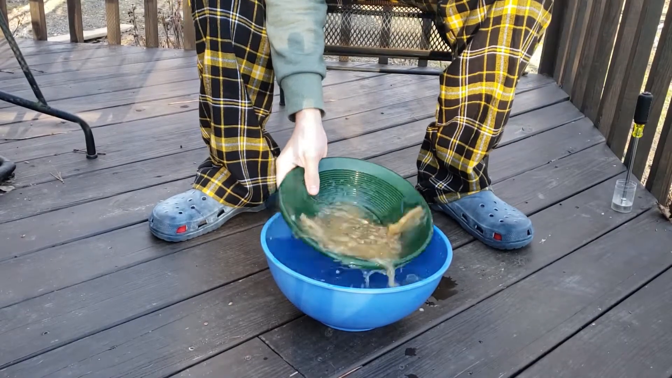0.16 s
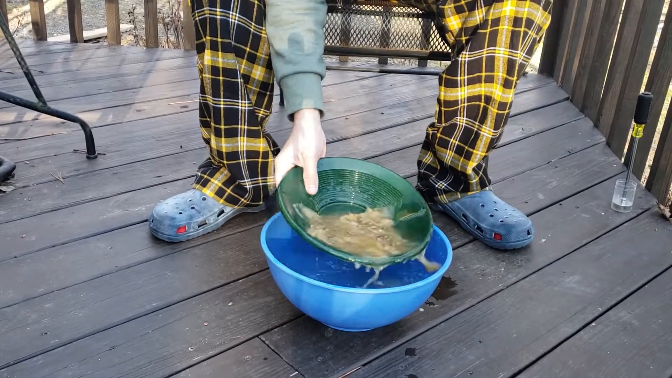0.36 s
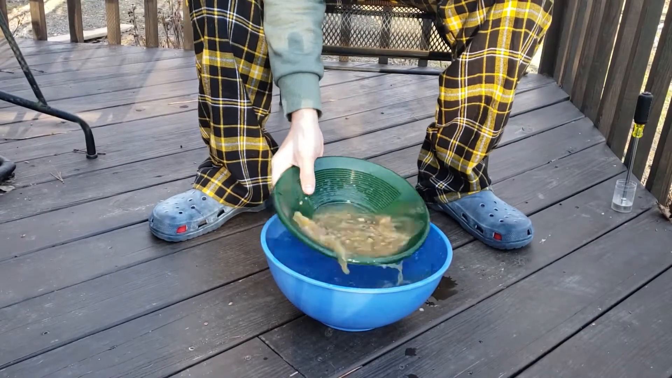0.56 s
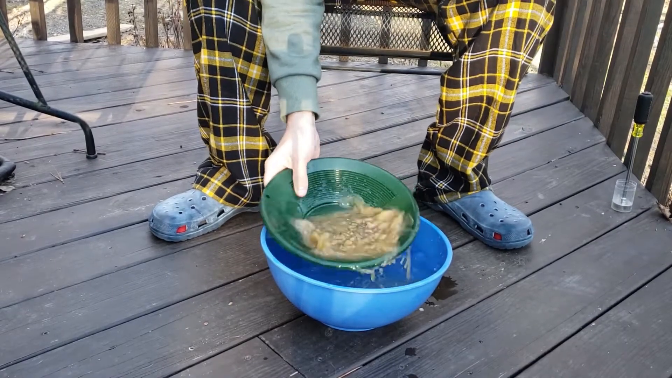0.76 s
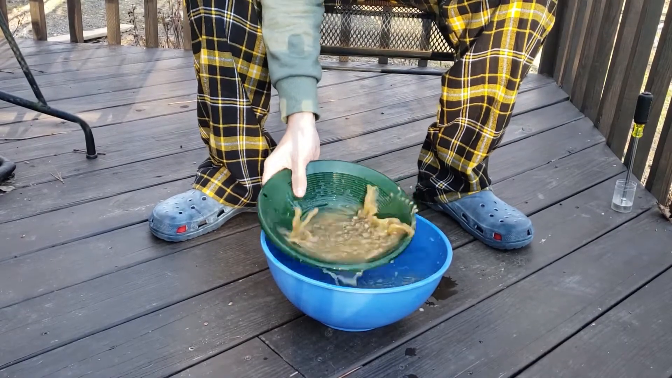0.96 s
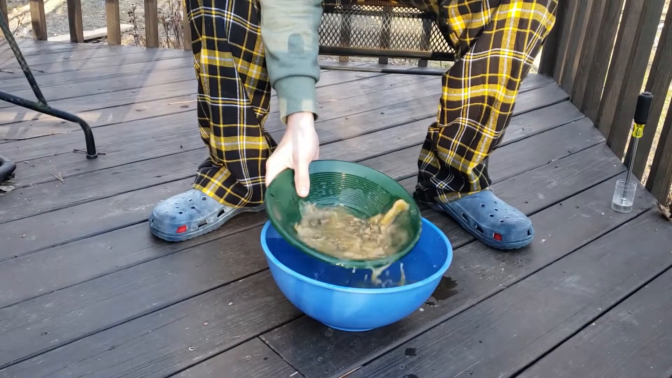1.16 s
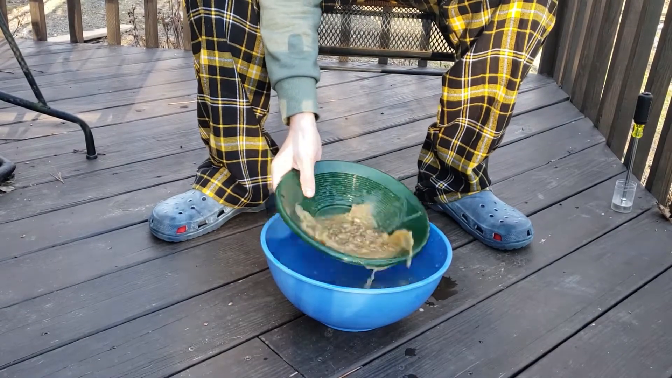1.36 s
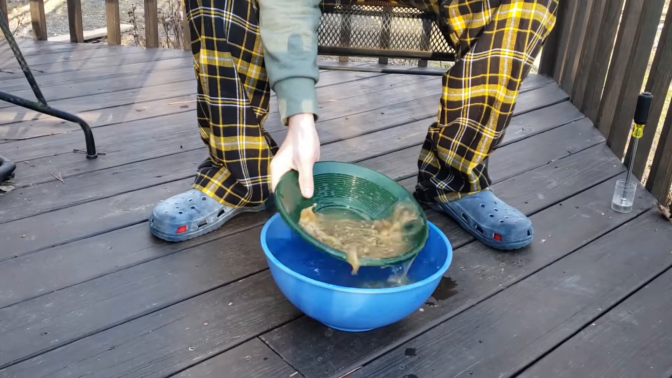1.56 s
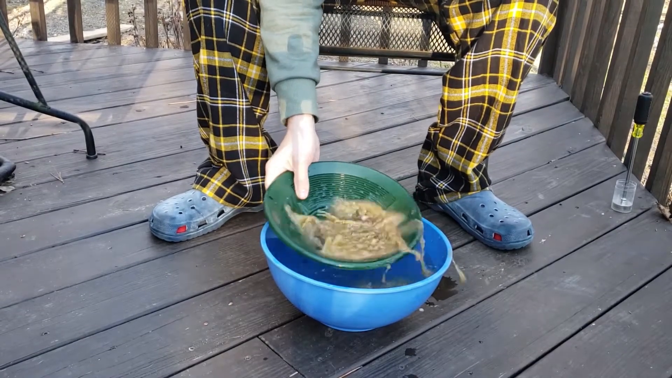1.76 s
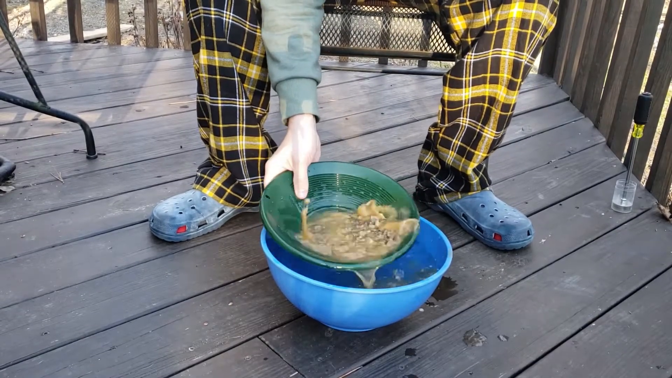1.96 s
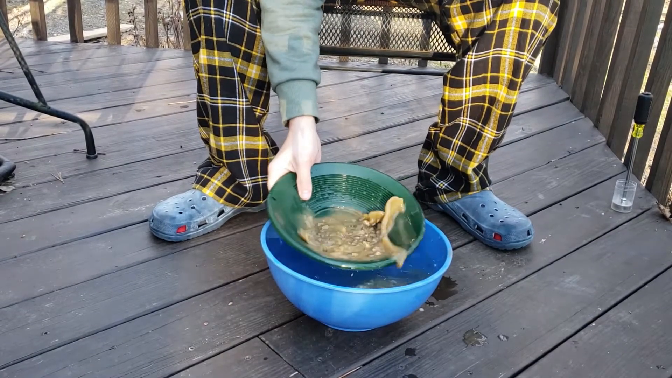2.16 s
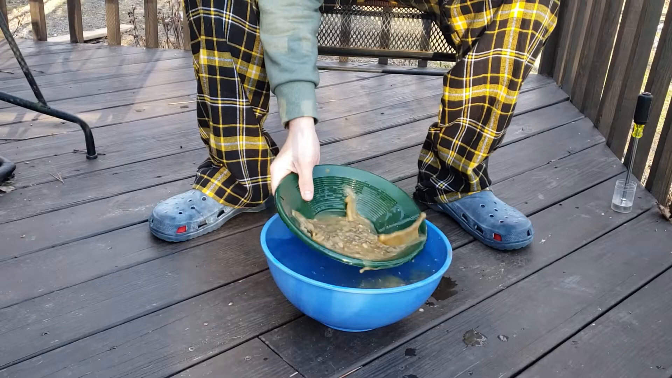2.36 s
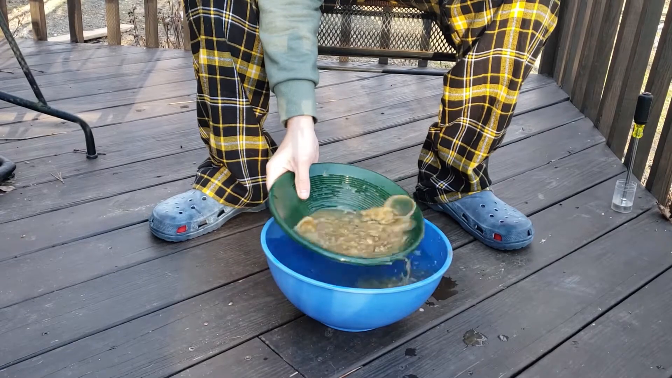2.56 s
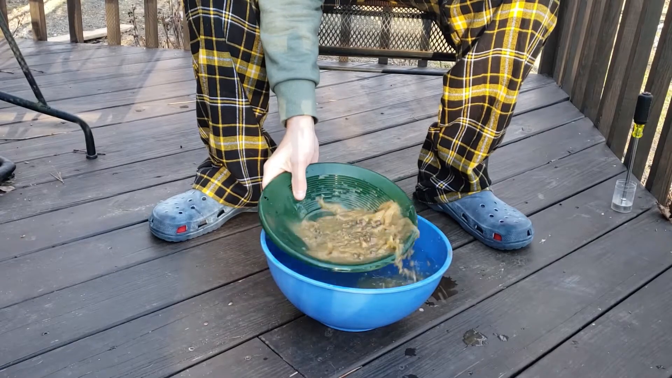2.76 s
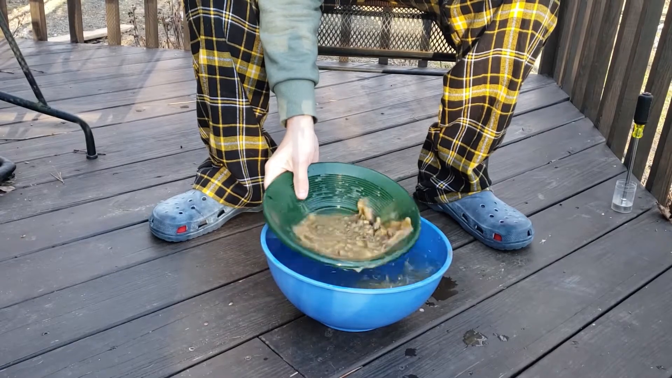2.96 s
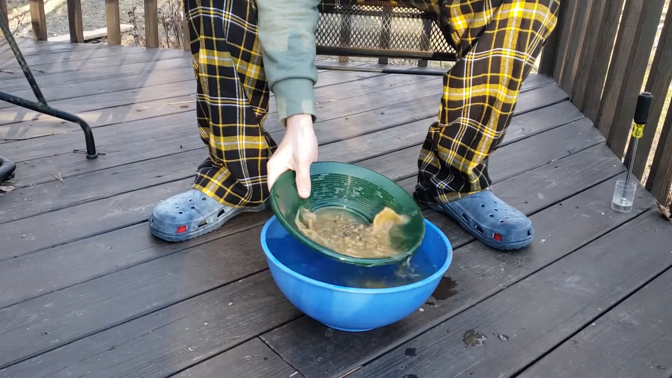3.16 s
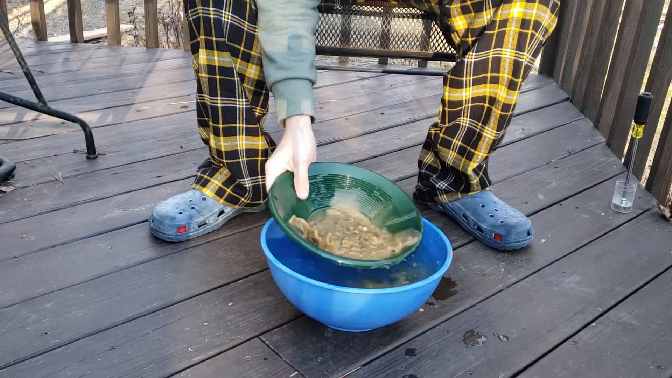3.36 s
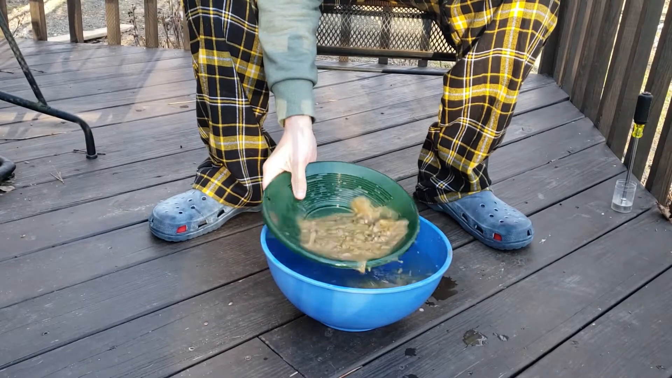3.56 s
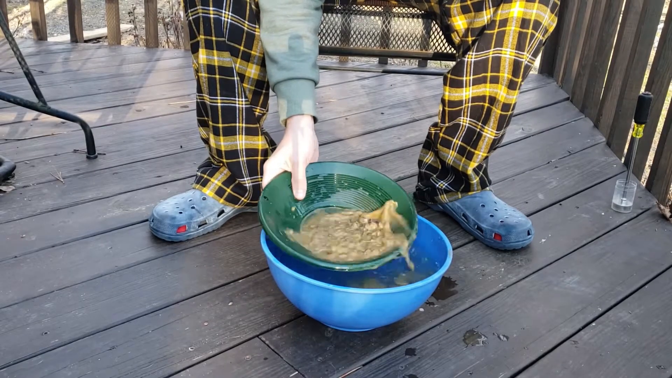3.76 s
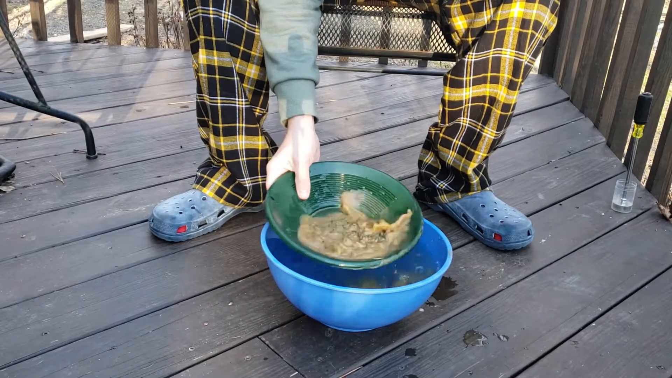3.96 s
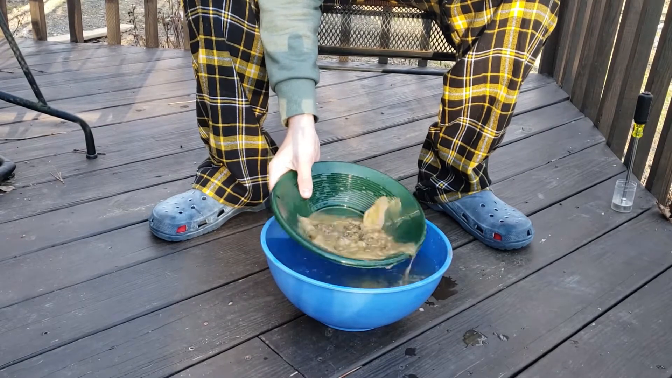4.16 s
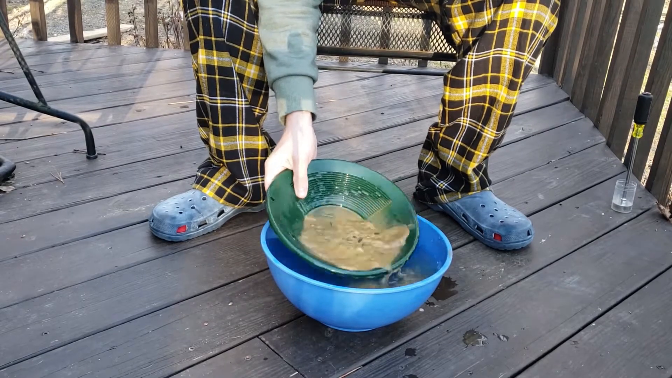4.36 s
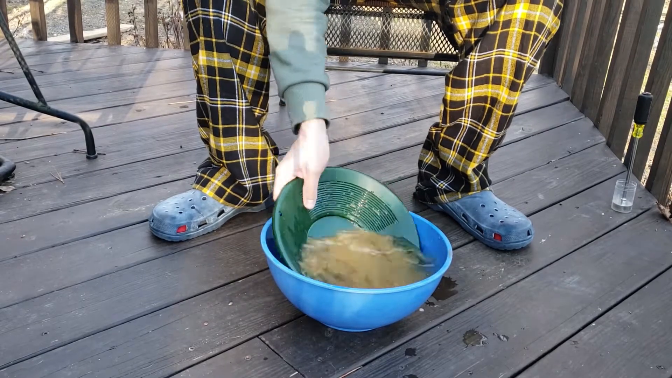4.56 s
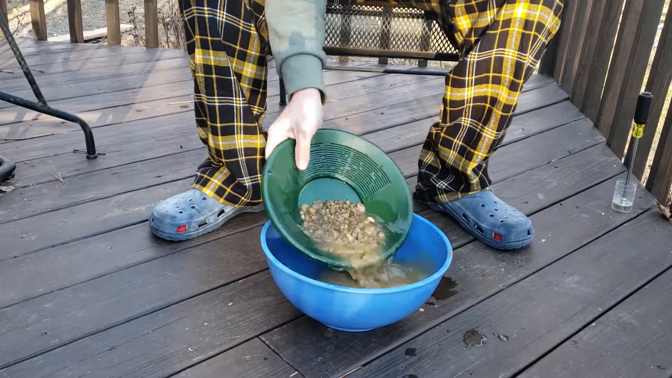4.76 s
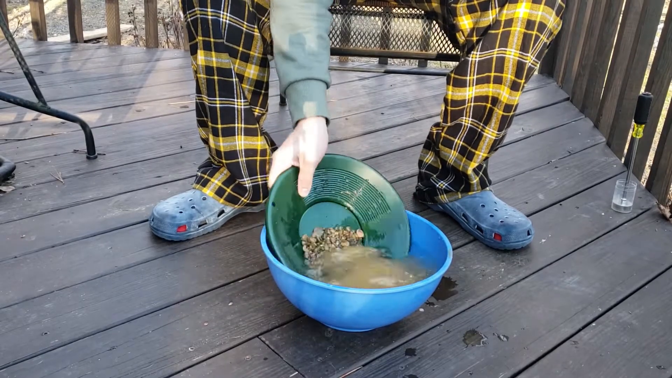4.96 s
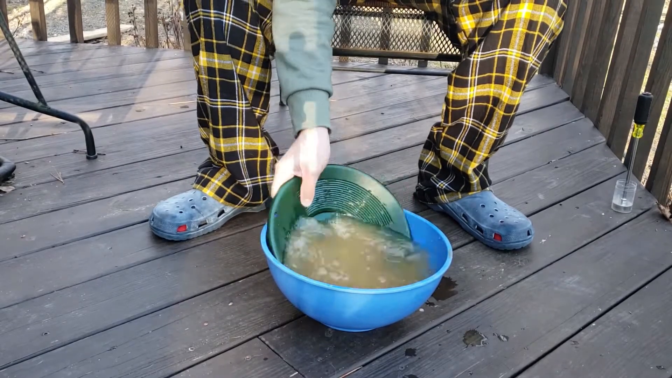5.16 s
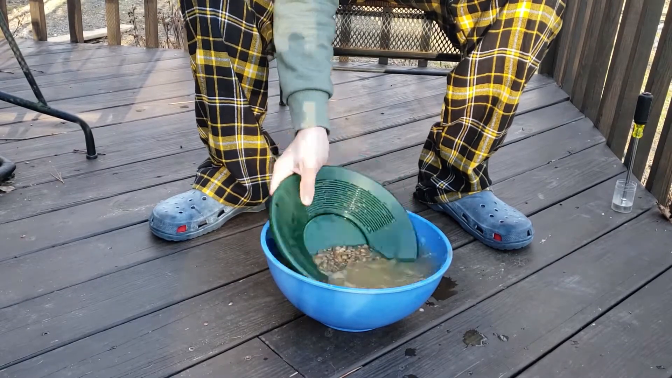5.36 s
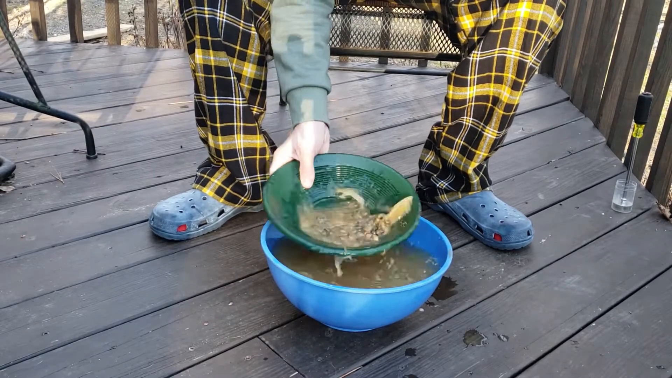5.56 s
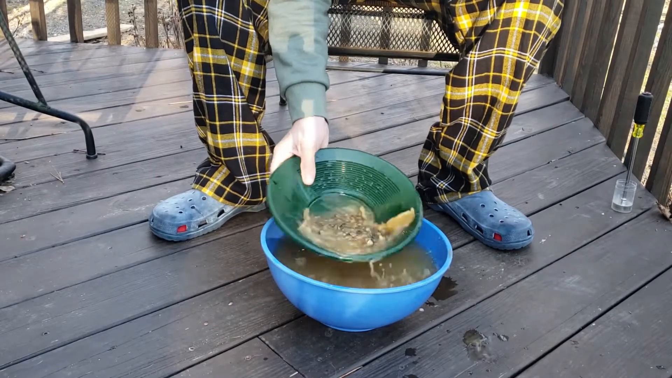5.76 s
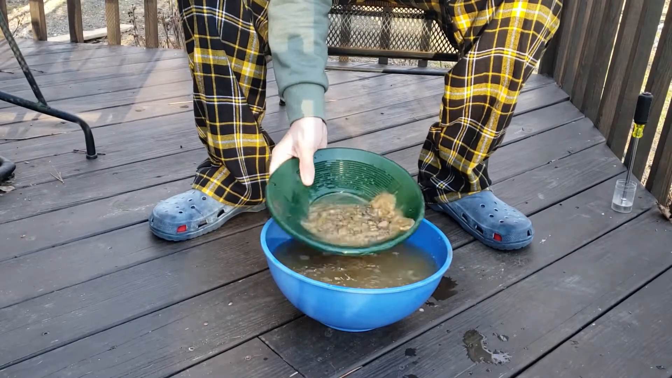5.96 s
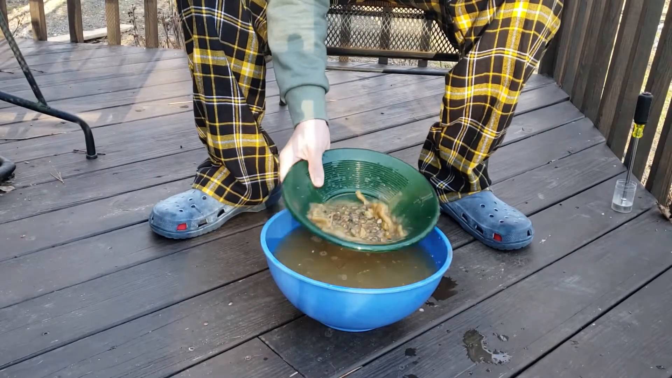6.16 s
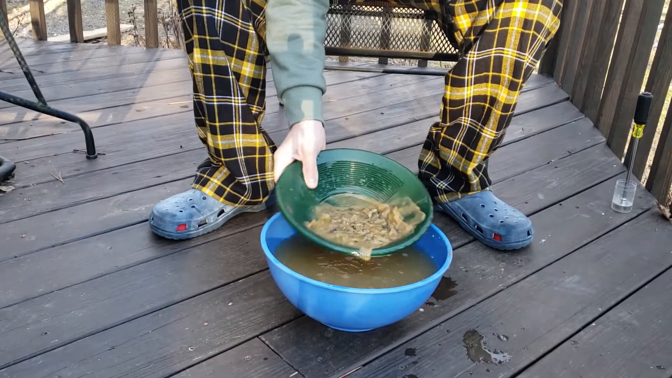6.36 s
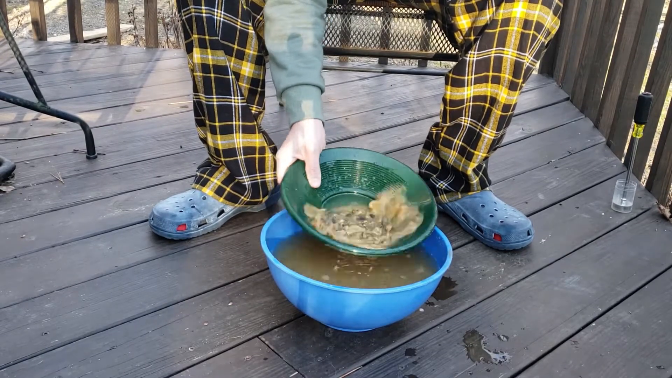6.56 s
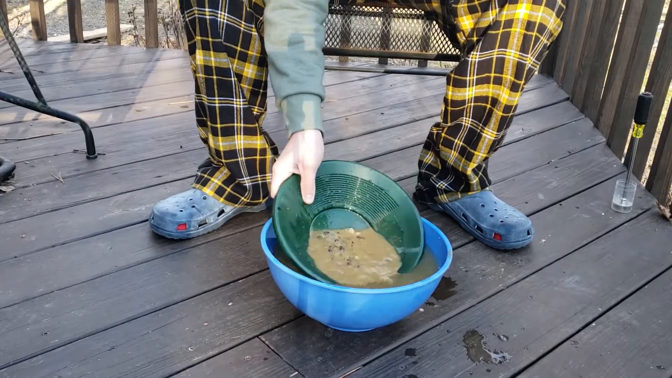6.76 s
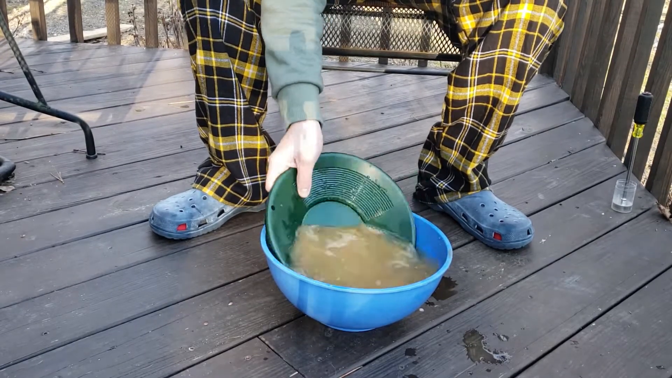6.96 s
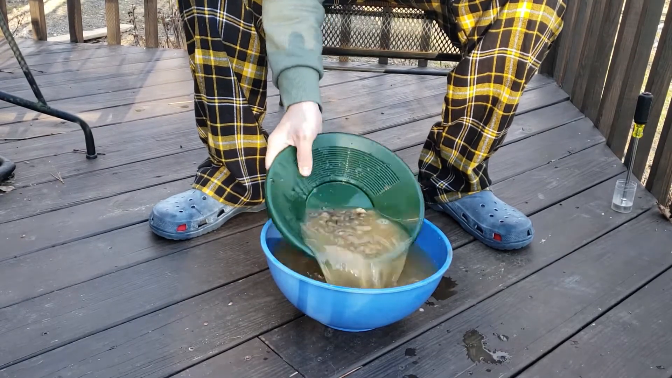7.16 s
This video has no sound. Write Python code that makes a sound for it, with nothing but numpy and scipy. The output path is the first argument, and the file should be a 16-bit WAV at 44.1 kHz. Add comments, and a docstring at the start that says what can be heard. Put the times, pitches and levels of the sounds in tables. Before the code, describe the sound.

On a breezy deck, a plastic pan of wet gravel is shaken in a fast, even rhythm, rattling and clacking while low gusts thump the microphone. A bird gives one faint, thin chirp as the shaking dies away. The rest is softer: water sloshes and bubbles in a tub, scattered drips tick, and wet sand slips across the pan with a fluttering hiss.

```python
"""On a breezy deck, wet gravel slides and rattles to and fro in a plastic pan shaken over a tub.
Stones strike the pan and its hollow body rings; wind buffets the left microphone; a bird chirps once.
The sound fades out and in again. Then bubbles gurgle in the tub, drops and grit tick,
and wet sand hisses in the pan with a fast flutter, over a quiet outdoor hush."""
import sys
import numpy as np
from scipy import signal
from scipy.fft import rfft, irfft, next_fast_len
from scipy.io import wavfile
from scipy.ndimage import uniform_filter1d

SR = 44100
rng = np.random.default_rng(int(sys.argv[2]) if len(sys.argv) > 2 else 0)


def file_out(sig):
    """Save sig as 16-bit WAV at sys.argv[1]."""
    # one column per channel
    cols = np.atleast_2d(sig).T
    # limit, then scale
    lim = np.clip(cols, -1, 1)
    pcm = np.round(lim * 32767).astype(np.int16)
    wavfile.write(sys.argv[1], SR, pcm)


N = 318402
T = np.arange(N) / SR
N_FFT = next_fast_len(N, True)
BIN_HZ = np.maximum(np.arange(N_FFT // 2 + 1) * SR / N_FFT, 1)
SHAKE_END_S, GUSTS_END_S = 4.45, 1.04

# Pan strokes. Each row: turn in seconds, slide level in dB.
STROKES = [(-0.04, -41), (0.035, -44.5), (0.125, -41), (0.189, -41.5), (0.298, -42), (0.384, -43),
           (0.465, -40.5), (0.558, -43), (0.642, -41), (0.722, -42), (0.811, -38.5), (0.894, -40),
           (0.978, -40), (1.057, -41.5), (1.146, -41.5), (1.219, -41.5), (1.317, -38.5), (1.39, -39),
           (1.492, -38), (1.558, -40), (1.653, -40.5), (1.727, -39.5), (1.812, -39.5), (1.904, -40.5),
           (1.982, -39.5), (2.08, -40.5), (2.152, -39), (2.235, -37.5), (2.31, -38), (2.385, -39),
           (2.467, -41.5), (2.536, -39.5), (2.634, -40.5), (2.71, -39.5), (2.787, -39.5), (2.869, -39.5),
           (2.956, -39.5), (3.036, -40), (3.118, -40), (3.194, -40.5), (3.282, -39), (3.365, -41),
           (3.448, -39), (3.528, -41), (3.61, -42), (3.702, -41.5), (3.782, -39.5), (3.867, -40),
           (3.943, -39.5), (4.032, -41), (4.119, -41), (4.195, -45.5), (4.285, -54), (4.364, -63)]
# Pan ringing under the load. Each row: time in seconds, level in dB.
PAN_RING_LEVEL = [(0.0, -53), (0.11, -58), (0.2, -52), (0.26, -49.5), (0.35, -63.5), (0.94, -49.5),
                  (0.98, -63), (1.01, -43.5), (1.05, -57), (1.54, -55.5), (1.57, -49.5), (1.72, -58),
                  (1.76, -49), (1.83, -62), (2.18, -53.5), (2.29, -53), (2.5, -61.5), (2.57, -49),
                  (2.67, -61), (2.72, -58), (2.8, -61), (2.84, -49.5), (2.885, -43), (2.92, -42.5),
                  (2.95, -59.5), (3.68, -52.5), (3.78, -56), (3.81, -55.5), (4.13, -59), (4.16, -52.5),
                  (4.27, -56), (4.3, -63), (4.39, -58), (4.44, -85)]
# Gravel rattle. Each row: frequency in Hz, relative density in dB.
GRAVEL_SPECTRUM = [(150, -31), (260, -21), (340, -24.5), (490, -12.5), (580, -21), (760, -4), (950, -5),
                   (1300, -8.5), (1700, -7.5), (2000, -6), (2350, -10), (2700, -9), (4990, -12.5),
                   (7060, -11), (8700, -20.5), (15200, -14.5), (16000, -21.5)]
# Rattle likeness between channels. Each row: frequency in Hz, shared power from 0 to 1.
GRAVEL_COHERENCE = [(60, 0.71), (130, 0.62), (290, 0.47), (640, 0.81), (1410, 0.47), (3100, 0.24),
                    (6820, 0.033), (15000, 0.01)]
# Rattle balance. Each row: frequency in Hz, left minus right in dB.
GRAVEL_BALANCE = [(60, 1.5), (110, 2.0), (200, 12), (380, 8.1), (700, 3.1), (1290, 2.1), (2380, 1.1),
                  (4400, 1.6), (8120, 4.8), (15000, 6.7)]
# Stones striking the pan. Each row: start in seconds, level in dB, ring in Hz.
STONE_HITS = [(0.1456, -29, 1210), (0.201, -38, 6500), (0.3091, -25, 1060), (0.3287, -26, 1890),
              (0.339, -28, 2300), (0.4858, -38, 1800), (0.664, -27, 2030), (0.676, -28, 1980),
              (0.7387, -37, 6800), (0.836, -25, 3370), (0.8785, -30, 5200), (0.8915, -26.5, 5270),
              (0.927, -31, 1470), (1.004, -24, 3320), (1.0103, -23, 2280), (1.0784, -33, 2240),
              (1.258, -28, 2330), (1.292, -29.5, 2980), (1.3276, -32, 980), (1.359, -29, 2230),
              (1.4107, -32, 2260), (1.478, -31, 3200), (1.52, -22, 2780), (1.523, -22.5, 1510),
              (1.531, -27, 3180), (1.5594, -29, 1040), (1.623, -23.5, 3890), (1.692, -29, 2000),
              (1.777, -30, 1700), (1.783, -29, 2300), (1.8413, -33, 1850), (1.861, -27, 1950),
              (2.0115, -26, 1990), (2.2735, -18, 2590), (2.277, -26, 2200), (2.3296, -26.5, 1990),
              (2.555, -26.5, 2050), (2.5601, -27, 1880), (2.576, -31, 1690), (2.696, -27.5, 1900),
              (3.0678, -37, 1000), (3.077, -31, 1610), (3.097, -33, 1500), (3.1497, -38, 1970),
              (3.166, -26, 1970), (3.302, -34, 2010), (3.406, -21, 3680), (3.4723, -25, 1730),
              (3.4758, -27, 1950), (3.557, -30, 2300), (3.817, -23, 3260), (3.824, -25.5, 2200),
              (3.908, -25.5, 2700), (4.004, -30, 2900), (4.0413, -29, 2360), (4.085, -26.5, 3080),
              (4.1644, -24.5, 2010), (4.3411, -38, 850)]
# Spells of sand hiss. Each row: start and end in seconds, start and end level in dB.
SAND_SPELLS = [(4.634, 4.722, -52, -63), (5.064, 5.141, -51, -41), (5.267, 5.388, -54.5, -51),
               (5.44, 6.759, -48.5, -44)]
# Sand hiss. Each row: frequency in Hz, relative density in dB.
SAND_SPECTRUM = [(24, -21), (40, -6.5), (250, -5.5), (500, -5), (1200, -6.5), (4500, -5.5), (8000, -5),
                 (15500, -5)]
# Bright band of the long hiss. Each row: time in seconds, centre in Hz, gain in dB.
SAND_SIZZLE = [(5.47, 5860, 0), (5.9, 5850, 3.5), (6.3, 6000, 5), (6.76, 6150, 4.5)]
# Sand slipping faster. Each row: peak time in seconds, gain in dB, fall in seconds.
SAND_SURGES = [(5.31, 8.5, 0.075), (5.695, 6, 0.025), (5.96, 2.5, 0.016), (5.97, 2.5, 0.44), (6.65, 0, .05)]
# Drops and grit. Each row: start in seconds, level in dB, ring in Hz, left minus right in dB.
TICKS = [(1.7358, -23, 13300, 4), (2.3785, -27, 14000, 6), (2.4062, -28, 13000, 6), (4.418, -45, 9000, 11),
         (4.556, -53, 11200, 24), (4.65, -33, 14900, 8), (4.666, -35, 12300, 3.0), (4.822, -43, 9880, 6),
         (4.911, -33.5, 9230, 6), (4.9372, -31.5, 15000, 8.5), (4.973, -37, 12600, 8), (5, -43, 1660, 7),
         (5.0798, -26.5, 3010, 12), (5.096, -25, 9870, 5), (5.114, -28, 9000, 11), (5.117, -21, 10300, 7),
         (5.1207, -24.5, 8350, 10), (5.1397, -29, 9000, 2), (5.146, -25.5, 11000, 9),
         (5.2081, -43, 8090, -1), (5.249, -44, 6690, 3), (5.272, -32, 3600, 10), (5.273, -25.5, 10700, 11),
         (5.2947, -26, 6570, 10), (5.373, -25, 4640, 3.5), (5.391, -28.5, 9460, 3), (6.2124, -33, 5550, 7),
         (6.2207, -34, 14500, 2), (6.3135, -45, 8660, 6), (6.4626, -38, 5670, 3), (6.649, -25, 6560, 2),
         (6.7045, -39, 2800, 4), (6.795, -43, 9000, 2), (6.843, -42.5, 8500, 4.5), (6.9364, -51, 1680, 16),
         (7.076, -31.5, 2780, 13.5), (7.0776, -36, 5900, 4), (7.0974, -45, 3010, 2),
         (7.2125, -44.5, 7190, -2)]
# Big bubbles. Each row: start in seconds, level in dB, starting pitch in Hz.
GLUGS = [(4.482, -56.5, 375), (4.491, -52, 440), (5.505, -52, 484), (5.547, -50, 377), (5.585, -49, 417),
         (5.598, -53, 366), (5.705, -40, 468), (5.751, -46, 430), (5.759, -45, 474), (5.785, -43.5, 478),
         (5.796, -50, 608), (5.99, -46, 624), (6.833, -60, 500), (6.845, -51, 600)]
# Water in the tub. Each row: time in seconds, level in dB.
GURGLE_LEVEL = [(4.46, -64.5), (5.0, -62), (5.45, -61), (5.78, -60), (5.86, -65), (6.1, -64), (6.4, -70),
                (7.22, -66.5)]
# Waves slapping the tub. Each row: peak time in seconds, level in dB, fall in seconds.
SLOSHES = [(4.49, -70, 0.014), (4.809, -51, 0.011), (5.08, -68, .015), (5.28, -59, 0.017),
           (5.555, -59, 0.03), (5.7, -57, 0.014), (5.755, -54, 0.034), (6.835, -58, 0.023)]
# Wind buffeting. Each row: time in seconds, level in dB.
WIND_LEVEL = [(0.0, -41), (0.21, -34), (0.26, -45), (0.32, -38), (0.38, -58), (0.54, -36), (0.65, -42.5),
              (0.75, -32), (1.02, -54), (1.29, -51), (1.32, -56.5), (1.45, -58), (1.52, -51.5), (1.67, -65),
              (1.7, -58.5), (1.85, -49), (1.91, -61), (2.07, -52), (2.1, -54), (2.19, -57), (2.22, -58),
              (2.35, -51.5), (2.49, -61), (2.58, -55), (2.76, -60), (2.79, -52), (3.08, -57), (3.13, -60),
              (3.25, -54), (3.37, -59.5), (3.54, -54), (3.58, -60.5), (3.85, -50.5), (3.9, -55),
              (3.94, -44.5), (4.09, -55), (4.12, -51), (4.2, -52.5), (4.24, -45), (4.3, -58), (4.33, -54),
              (4.45, -57)]
# Wind rumble. Each row: frequency in Hz, relative density in dB.
WIND_SPECTRUM = [(15, -48), (27, -16), (40, -11.5), (55, 1.5), (72, -2.5), (100, -9.5), (140, -14.5),
                 (250, -31.5), (460, -38), (770, -120)]
# Gust thumps. Each row: start in seconds, level in dB, final pitch in Hz, T60 in seconds.
THUMPS = [(0.057, -29, 97, 0.14), (0.102, -10.5, 73.4, 0.038), (0.159, -22.5, 94, 0.079),
          (0.21, -22.5, 72, 0.099), (0.308, -19.5, 75.5, 0.081), (0.52, -3.5, 70, 0.011),
          (0.726, -49, 73.4, 0.06), (0.82, -35, 61.9, 0.076)]
# Bird note. Each row: time in seconds, pitch in Hz, level in dB.
CHIRP = [(4.379, 7450, -78), (4.386, 7500, -53), (4.396, 7150, -58), (4.42, 7170, -57), (4.443, 7100, -73)]
# Outdoor hush. Each row: time in seconds, level in dB.
AIR_LEVEL = [(4.46, -66), (5.0, -60.5), (5.3, -62), (6.78, -62.5), (7.22, -62.5)]
# Hush colour. Each row: frequency in Hz, relative density in dB.
AIR_SPECTRUM = [(100, -20), (300, 5.5), (600, 5.5), (1500, 2.5), (3000, -4.5), (8000, -3.5), (16000, -7.5)]
# Overall fade. Each row: time in seconds, gain in dB.
FADE = [(4.42, 2.5), (4.435, -11.5), (4.447, -22), (4.46, -23), (4.472, -5), (4.49, -2.5)]


def gravel(ring_hz=754.6, ring_width_hz=118, rest_db=-56.5):
    """Each stroke the load stalls at the turn, then slides and rattles over the pan's ridges."""
    turn_s, slide_db = np.transpose(STROKES)
    edges_s = np.append(turn_s, SHAKE_END_S)
    stroke = np.clip(np.searchsorted(edges_s, T) - 1, 0, len(turn_s) - 1)
    progress = np.clip((T - edges_s[stroke]) / np.diff(edges_s)[stroke], 0, 1)
    direction = np.arange(len(turn_s)) % 2
    stall_db = np.array([-10.5, -6])[direction]  # deeper at one end of the swing
    around_db = (slide_db + np.append(slide_db[0], slide_db[:-1])) / 2
    floor_db = np.interp(T, turn_s, np.maximum(around_db + stall_db, rest_db))
    fastest_at = np.array([.52, .48])[direction[stroke]]
    speed = np.sin(np.pi * progress ** (np.log(.5) / np.log(fastest_at))) ** 0.9
    level = undb(floor_db + (slide_db[stroke] - floor_db) * speed) * (T < SHAKE_END_S)
    rattle = stereo(grains(3000, 2.28, 0.00087), per_bin(GRAVEL_COHERENCE), per_bin(GRAVEL_BALANCE))
    # the hollow pan rings on through the turns, a little weaker
    drive = rattle * undb(2.5 * speed + 2 * wander(23.86))
    ring = resonate(resonate(drive, ring_hz, ring_width_hz), ring_hz, 2 * ring_width_hz)
    slide = load_shift(colour(rattle, GRAVEL_SPECTRUM)) + undb(-9) * cut_bass(clacks())
    return level * slide + unit(ring) * envelope(PAN_RING_LEVEL)


def load_shift(x, depth_db=0.97, rate_hz=25):
    """Each octave swells and fades on its own as the load shifts, the lowest most."""
    spectrum, out = rfft(x, N_FFT), 0
    octave = np.log2(np.maximum(BIN_HZ, 250) / 250)
    for k in range(8):
        share = np.clip(1 - np.abs(octave - k), 0, 1)
        drift_db = depth_db * wander(rate_hz) + (k == 0) * 3.5 * wander(10)
        out = out + irfft(spectrum * share, N_FFT)[..., :N] * undb(drift_db)
    return unit(out)


def clacks(count=2000):
    """Pebbles collide at random and ring briefly."""
    out, t = np.zeros((2, N)), T[:500]
    for when, pitch_a, pitch_b, size, side, sustain in rng.random((count, 6)):
        hz = 1300 * 4.5 ** ((pitch_a + pitch_b) / 2)
        ring = np.sin(2 * np.pi * hz * t) * np.exp(-hz * t / (1 + 11 * sustain ** 4))
        size_db = -1.8 * np.log(1 - .95 * size)
        add(out, SHAKE_END_S * when, ring * undb(size_db) * balance(1 + 18.4 * (side - .5)))
    return out / rms(out[:, T < SHAKE_END_S])


def stones(crack_t60_s=0.0058, ring_t60_s=0.025):
    """A stone hits the pan: hard contact, a crack with a rebound, a slightly rising ring."""
    out, t = np.zeros((2, N)), T[:2000]
    for start_s, db, hz in STONE_HITS:
        burst = decay(t, crack_t60_s) * attack(t, 0.00045)
        noise = rng.standard_normal((3, len(t)))
        rebound = 0.29 * np.roll(burst, int(SR * rng.uniform(0.0041, 0.0044)))
        crack = noise * (burst + rebound)
        centre = resonate(crack[0] + 1.46 * contact(t, .0005), hz, 0.94 * hz)
        sides = crack[1:] * min(hz / 2400, 1.6)
        ring = np.sin(2 * np.pi * hz * t * (1 + 5.9 * t)) * decay(t, ring_t60_s) * attack(t, 0.00018)
        knock = 0.28 * ring + 1.13 * centre + 0.45 * sides
        add(out, start_s, at_peak(knock, db) * balance(3))
    return cut_bass(out)


def sand(flutter_hz=94.9, flutter_depth_db=1.5, attack_s=0.027, release_s=0.03):
    """Fine grains slip in spells: a fluttering hiss with a bright band."""
    hiss = unit(colour(stereo(grains(4000, 2.36, 0.00046), 0.17, 5.7), SAND_SPECTRUM))
    time_s, centre_hz, sizzle_db = np.transpose(SAND_SIZZLE)
    # low noise band shifted up to the moving centre
    narrow = butter(stereo(grains(2700, 1.8, 0.0022), 0.53, 3), 2, 480)
    sizzle = unit(narrow * sine(np.interp(T, time_s, centre_hz)))
    sizzle *= envelope(np.transpose([time_s, sizzle_db]))
    flutter_db = flutter_depth_db * (1 + 0.5 * wander(60)) * np.sin(2 * np.pi * flutter_hz * T + 0.37)
    spells = 0
    for start_s, end_s, start_db, end_db in SAND_SPELLS:
        onset = np.clip((T - start_s) / attack_s, 0, 1)
        release = np.clip(1 + (end_s - T) / release_s, 0, 1) ** 2
        spells += undb(np.interp(T, [start_s, end_s], [start_db, end_db])) * onset * release
    surge_db = sum(db * swell(peak_s, 0.045, fall_s) for peak_s, db, fall_s in SAND_SURGES)
    return (hiss + undb(-15.5) * sizzle) * spells * undb(surge_db + flutter_db + 0.26 * wander(8.4))


def ticks():
    """Drops and grit land: a bright crack, a brief ring, a short spray tail."""
    out, t = np.zeros((2, N)), T[:2000]
    for start_s, db, hz, balance_db in TICKS:
        burst = (decay(t, 0.0081) + 0.097 * decay(t, 0.055)) * attack(t, 0.00035)
        noise = rng.standard_normal((3, len(t))) * burst
        crack = 0.5 * noise[0] + 1.13 * noise[1:] + 0.99 * np.gradient(contact(t, .0006))
        ring = np.sin(2 * np.pi * hz * t) * decay(t, .014)
        tick = crack + 0.34 * ring - 0.18 * resonate(crack, 125, 280)
        add(out, start_s, at_peak(tick, db) * balance(balance_db))
    return out


def glugs(decay_cycles=0.99):
    """Big bubbles plop, rising in pitch as they die."""
    out, t = np.zeros((2, N)), T[:1500]
    for start_s, db, hz in GLUGS:
        tone = np.sin(2 * np.pi * hz * t * (1 + 5.5 * t))
        plop = tone * np.exp(-hz * t / decay_cycles) * attack(t, 0.00093)
        add(out, start_s, at_peak(plop, db) * balance(-1.4))
    return out


def gurgle(count=2000, start_s=4.4, span_s=2.8):
    """Water sloshes in the tub: many short rising bubbles, louder at each wave."""
    out, t = np.zeros((2, N)), T[:1200]
    for when, pitch_a, pitch_b, size, side, phase in rng.random((count, 6)):
        hz = 340 * 2.8 ** ((pitch_a + pitch_b) / 2)
        cycles = hz * t
        bubble = np.sin(2 * np.pi * (phase + cycles * (1 + 1.85 * t))) * cycles * np.exp(-cycles / 1.08)
        size_db = -1.6 * np.log(1 - .99 * size)
        add(out, start_s + span_s * when, bubble * undb(size_db) * balance(25.2 * (side - .5)))
    waves = sum(undb(db) * swell(peak_s, 0.0068, fall_s) for peak_s, db, fall_s in SLOSHES)
    level = envelope(GURGLE_LEVEL) * undb(1.1 * wander(19)) + waves
    return out / rms(out[:, int(start_s * SR):]) * level


def wind():
    """Low buffeting, with thumps on the left; the early gusts hit each microphone on its own."""
    turbulence = lambda: undb(1.25 * wander(25)) * rng.standard_normal(N)
    calm = unit(colour(stereo(turbulence, 0.74, 3.1), WIND_SPECTRUM))
    gusty = unit(colour(stereo(turbulence, 0.053, 6.7), WIND_SPECTRUM))
    out = np.where(T < GUSTS_END_S, gusty, calm) * envelope(WIND_LEVEL)
    t = T[:6000]
    for start_s, db, hz, t60_s in THUMPS:
        # pitch falls as the pressure settles
        push = np.sin(2 * np.pi * hz * (t + 0.0068 * attack(t, 0.005)))
        add(out[0], start_s, undb(db) * push * attack(t, 0.003) * decay(t, t60_s))
    return out


def bird():
    """One thin wavering note."""
    time_s, hz, db = np.transpose(CHIRP)
    note = sine(np.interp(T, time_s, hz) + 60 * wander(400)) * envelope(np.transpose([time_s, db]))
    return np.sqrt(2) * note * undb(2.7 * wander(300)) * balance(5)


def air():
    """Outdoor hush with tiny bursting bubbles, after the shaking; the treble thins at the end."""
    hush = unit(colour(stereo(lambda: rng.standard_normal(N), 0.28, 4.4), AIR_SPECTRUM))
    bursts = stereo(grains(40, 1.4, 0.0019), 0.46, 4)
    hush += undb(-7) * butter(bursts, 2, 4000, "high")
    dullness = np.interp(T, [6.8, 7.15], [.1, .6])
    hush += (butter(hush, 1, 5000) - hush) * dullness
    level_db = np.interp(T, *np.transpose(AIR_LEVEL)) + 1.2 * wander(11)
    return hush * undb(level_db) * (T > SHAKE_END_S)


def grains(rate_hz, spread_db, tail_s):
    """Source of noises with one shared loudness that jumps at each collision and dies away."""
    hit, size = rng.random((2, N))
    pulses = (hit < rate_hz / SR) * undb(-2 * spread_db * np.log(1 - .999 * size))
    power = signal.lfilter([1], [1, -np.exp(-1 / (tail_s * SR))], pulses)
    loudness = unit(np.sqrt(power))
    return lambda: loudness * rng.standard_normal(N)


def stereo(draw, coherence, balance_db):
    """Left and right from one shared and two separate draws."""
    shared = np.sqrt(coherence) * rfft(draw(), N_FFT)
    separate = np.sqrt(1 - coherence) * rfft([draw(), draw()], N_FFT)
    return irfft(balance(balance_db) * (shared + separate), N_FFT)[:, :N]


def colour(x, spectrum):
    """Minimum-phase filter; keeps clicks sharp."""
    cepstrum = irfft(np.log(undb(per_bin(spectrum))), N_FFT)
    cepstrum[1:N_FFT // 2] *= 2
    cepstrum[N_FFT // 2 + 1:] = 0
    return irfft(rfft(x, N_FFT) * np.exp(rfft(cepstrum)), N_FFT)[..., :N]


def per_bin(rows):
    hz, value = np.transpose(rows)
    return np.interp(np.log(BIN_HZ), np.log(hz), value)


def resonate(x, hz, width_hz):
    return signal.lfilter(*signal.iirpeak(hz, max(hz / width_hz, .3), SR), x)


def butter(x, order, hz, kind="low"):
    return signal.sosfilt(signal.butter(order, hz, kind, fs=SR, output="sos"), x)


def cut_bass(x):
    """Steep high-pass: the clacks and stones carry little below about 660 Hz."""
    return butter(x, 4, 660, "high")


def wander(rate_hz):
    """Slewed random steps, RMS 1."""
    hold = int(SR / rate_hz)
    steps = np.repeat(rng.standard_normal(N // hold + 1), hold)[:N]
    return unit(uniform_filter1d(steps, hold))


def envelope(rows):
    """Gain from rows of seconds and dB; silent outside them."""
    return undb(np.interp(T, *np.transpose(rows), left=-200, right=-200))


def swell(peak_s, rise_s, fall_s):
    return np.exp(-np.abs(T - peak_s) / np.where(T < peak_s, rise_s, fall_s))


def contact(t, at_s):
    """Pulse of a hard first contact."""
    return np.exp(-.5 * ((t - at_s) / .00004) ** 2)


def attack(t, rise_s):
    return 1 - np.exp(-t / rise_s)


def decay(t, t60_s):
    return undb(-60 * t / t60_s)


def sine(hz):
    return np.sin(2 * np.pi * np.cumsum(hz) / SR)


def balance(left_minus_right_db):
    return undb(np.array([[.5], [-.5]]) * left_minus_right_db)


def undb(db):
    return 10 ** (np.asarray(db) / 20)


def rms(x):
    return np.sqrt(np.mean(x ** 2))


def unit(x):
    return x / rms(x)


def at_peak(x, db):
    return undb(db) * x / np.abs(x).max()


def add(out, start_s, sound):
    i = int(start_s * SR)
    out[..., i:i + sound.shape[-1]] += sound[..., :N - i]


def scene():
    return gravel() + stones() + ticks() + sand() + gurgle() + glugs() + air() + wind() + bird()


def record(dry, top_hz=15900):
    """The sound fades out, then back in at a lower gain; the top is cut."""
    faded = dry * undb(np.interp(T, *np.transpose(FADE)))
    return signal.sosfilt(signal.ellip(10, .2, 70, top_hz, fs=SR, output="sos"), faded)


dry = scene()
out = record(dry)
file_out(out)
```